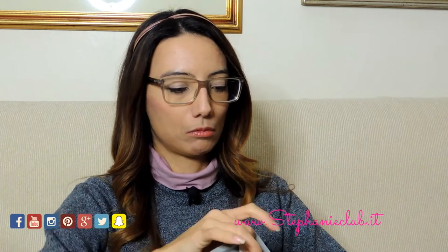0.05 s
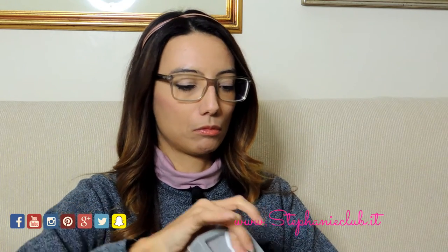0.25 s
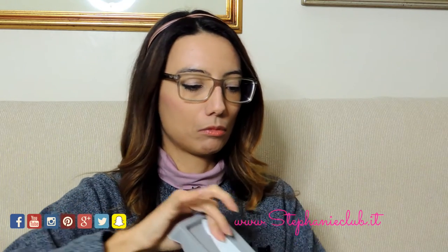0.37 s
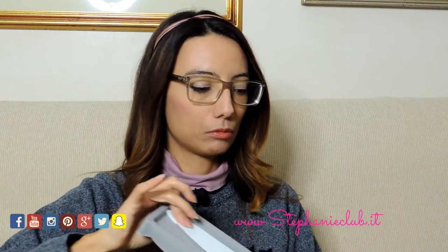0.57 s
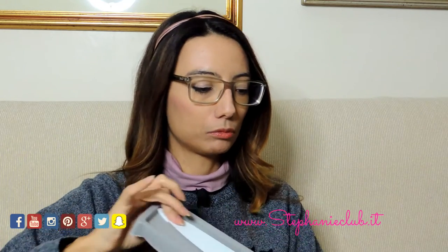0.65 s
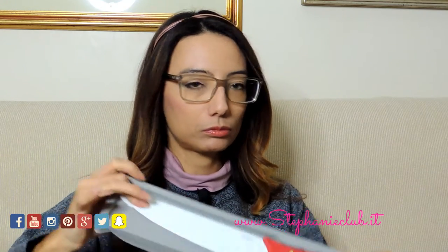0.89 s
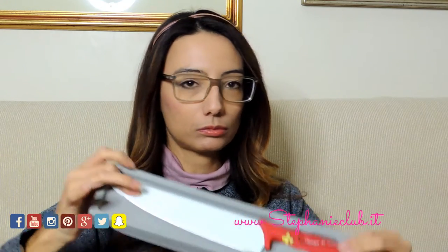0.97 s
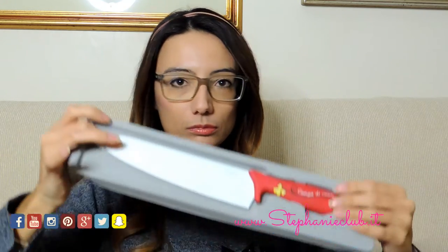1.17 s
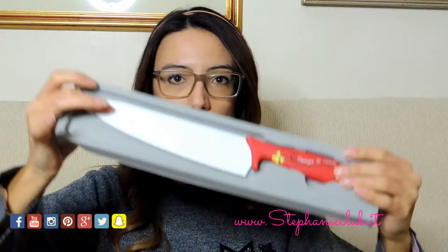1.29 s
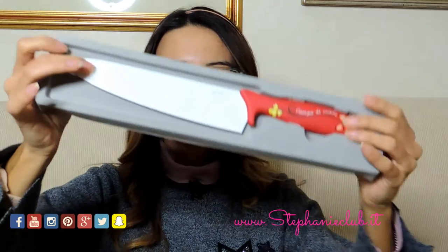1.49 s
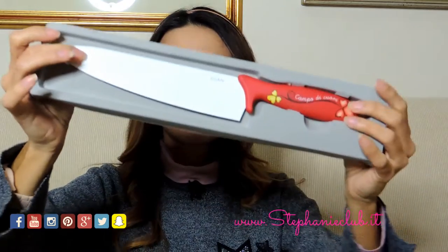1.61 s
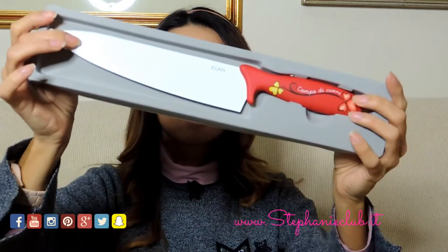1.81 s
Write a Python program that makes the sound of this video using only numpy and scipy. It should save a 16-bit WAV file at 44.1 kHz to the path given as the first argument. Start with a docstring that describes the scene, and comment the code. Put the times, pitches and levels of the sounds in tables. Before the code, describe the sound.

A moulded plastic tray snaps and knocks in the hands, then rustles softly as it is lifted

```python
"""A short fingertip stroke over a faint hiss, then snaps and knocks of a moulded plastic tray holding a knife.
Hands handle it in a living room: more strokes and a dry tick, then it is lifted with a long rustle of skin
and wool, with a second tick and soft thumps in it. Contacts ring the tray's modes, thumps ring single low
tones, strokes and rustle are made of tiny slips, and ticks are noise bursts with short resonances.
Fading noise makes the room ring on after the sounds."""
import sys
import numpy as np
from scipy import signal
from scipy.fft import rfft, irfft
from scipy.io import wavfile

SR = 44100
rng = np.random.default_rng(int(sys.argv[2]) if len(sys.argv) > 2 else 0)


def waveform_to_disk(signal):
    """Save audio, clipped to [-1, 1], as 16-bit WAV at the path in sys.argv[1]."""
    frames = np.transpose(np.atleast_2d(signal))
    scaled = np.clip(frames, -1, 1) * 32767
    samples = np.round(scaled).astype(np.int16)
    wavfile.write(sys.argv[1], SR, samples)


def convert_level_to_amplitude(level_db):
    """Map a level in decibels to its linear amplitude factor."""
    exponent = np.asarray(level_db, float) / 20
    return 10 ** exponent


N = 81585
T = np.arange(N) / SR
TILT_HZ = 1500   # a contact's tilt leaves this pitch unchanged


def rms_one(x):
    """Scale to unit rms."""
    return x / np.sqrt(np.mean(x ** 2) + 1e-20)


def at_hz(points, hz):
    """Read a table of (Hz, value) on a log-frequency axis."""
    table_hz, values = np.array(points).T
    return np.interp(np.log(hz), np.log(table_hz), values)


def drift(rate_hz):
    """Slow random wandering with spread 1: smoothed noise, made at every 40th sample."""
    pole = np.exp(-80 * np.pi * rate_hz / SR)
    noise = rng.standard_normal(N // 40 + 2002)
    slow = signal.lfilter([1], [1, -2 * pole, pole * pole], noise)[2000:]   # skip the settling
    return np.interp(np.arange(N) / 40, np.arange(len(slow)), rms_one(slow))


def ring(clicks, hz, t60):
    """A unit click starts a sine of height 1 that fades by 60 dB in t60 seconds."""
    pole, turn = convert_level_to_amplitude(-60 / (t60 * SR)), 2 * np.pi * hz / SR
    return signal.lfilter([0, np.sin(turn)], [1, -2 * pole * np.cos(turn), pole * pole], clicks + 1e-18)


def spectrum_hz():
    """The pitches of the spectrum bins, with the lowest held at 1 Hz."""
    return np.maximum(np.arange(N // 2 + 1) * SR / N, 1)


def colour(x, spectrum):
    """Shape a signal's spectrum by a table of levels, then scale it to unit rms."""
    return rms_one(irfft(rfft(x) * convert_level_to_amplitude(at_hz(spectrum, spectrum_hz())), N))


def lowpass(x, hz):
    """Gently soften everything above hz."""
    return signal.sosfilt(signal.butter(1, hz, fs=SR, output="sos"), x)


# Colour of the faint steady hiss. Each row: pitch in Hz, relative level in dB per Hz.
HISS = [(25, 4), (45, -17), (80, -19), (100, -3.5), (125, -2), (230, -4.5), (460, -7), (850, -11),
        (1530, -19.5), (2050, -20.5), (3000, -22.5), (5000, -24), (9000, -28), (15500, -33.5)]


def hiss():
    """Steady random noise, coloured and set to a low level."""
    level_db = -61.5
    return convert_level_to_amplitude(level_db) * colour(rng.standard_normal(N), HISS)


# How long the room rings. Each row: pitch in Hz, time to fade by 60 dB in seconds.
ROOM_T60 = [(150, 0.28), (400, 0.595), (1000, 0.632), (2800, 0.691), (7000, 0.476), (14000, 0.526)]


def room(x):
    """A diffuse tail: third-octave bands of noise, each dying at its own rate."""
    onset_s = 0.00924
    edges = np.minimum(22 * 2 ** np.arange(0, 10, 1 / 3), 18000)[6:]   # Hz
    white, tail = rng.standard_normal((2, N // 2)), 0
    age = np.arange(N // 2) / SR
    for k, (low, high) in enumerate(zip(edges, edges[1:])):
        bandpass = signal.butter(2, [low, high], "band", fs=SR, output="sos")
        band = signal.sosfilt(bandpass, white[k % 2])   # neighbours use different noise
        t60 = at_hz(ROOM_T60, np.sqrt(low * high))
        tail = tail + band * convert_level_to_amplitude(-60 * age / t60)
    tail = tail * np.clip(age / onset_s, 0, 1) ** 2 * 0.012
    return signal.fftconvolve(x, tail)[:N]


# What a contact sends to the walls, summed over all directions.
# Each row: pitch in Hz, relative level in dB per Hz.
RADIATED = [(80, -38), (200, -20), (450, -18), (780, -13), (930, 2.5), (1100, -6.5), (1250, -11),
            (1410, -4.5), (1620, -14), (1820, -4.5), (2050, -16), (2600, -20), (2940, -12.5), (3700, -14),
            (4800, -19), (6500, -29), (14000, -52)]


def radiated():
    """The contacts as the walls receive them: broader in pitch than at the microphone."""
    gain_db = 33.5
    hz, blows = spectrum_hz(), 0
    for s, db, tilt, _ in CONTACTS:
        delay = np.exp(-2j * np.pi * hz * s)   # places the blow at s seconds
        blows = blows + convert_level_to_amplitude(db + tilt * np.log2(hz / TILT_HZ)) * delay
    return irfft(blows * convert_level_to_amplitude(gain_db + at_hz(RADIATED, hz)), N)


def grains(spectrum):
    """Dense tiny slips of uneven size, coloured and flickering in strength."""
    per_s, spread_db, patchy_db, flicker_hz = 16000, 0.65, 1.5, 16.7
    happens = rng.random(N) < per_s / SR
    uneven = convert_level_to_amplitude(spread_db * np.minimum(rng.exponential(1, N), 4))
    slips = happens * rng.standard_normal(N) * uneven
    return rms_one(colour(slips, spectrum) * convert_level_to_amplitude(patchy_db * drift(flicker_hz)))


# The long rustle of the lift. Each row: time in seconds, level of the middle scrape in dB,
# then the level of the body and of the top, both in dB relative to the scrape.
RUSTLE = [(0.874,-83.5,-2,0.5), (0.88,-64,-11,2), (0.906,-50.5,-4,-5), (0.938,-52,1,-1.5),
          (0.965,-51.5,-2.83,-6.5), (1.028,-51.5,-6.5,4), (1.098,-51,-1,0.5), (1.125,-55,-3.5,-2),
          (1.152,-57.5,-7,1), (1.185,-54,-0.5,-3), (1.216,-49.5,-1.5,-3), (1.262,-53,0,-3),
          (1.32,-58.5,-5,-2.5), (1.356,-54,-2,0), (1.444,-56.5,-3.5,-2), (1.478,-66,-1,2), (1.54,-61,1.5,0),
          (1.68,-60,2,2), (1.83,-58,1,-0.5), (1.85,-61,-4,-1)]
# Colours of its scrape, body and top. Each row: pitch in Hz, relative level in dB per Hz.
RUSTLE_MID = [(1290, -49.5), (2200, -18.5), (2390, -3.5), (2600, -5), (3240, -1.5), (3780, -1.5),
              (4360, -0.5), (4820, -4.5), (6000, -8), (7800, -18.5), (9500, -54)]
RUSTLE_BODY = [(120, -50), (200, -20.5), (260, -13), (358, -13.5), (529, -4.5), (568, -5.5), (1470, -10),
               (2200, -11), (2860, -34.5)]
RUSTLE_TOP = [(4500, -21.5), (6000, -1), (8400, -3.5), (10500, -2.5), (13000, -6.5), (15600, -7)]


def rustle():
    """Slips heard as a scrape, through the body of the tray and as fine hiss above."""
    s, db, body_db, top_db = np.transpose(RUSTLE)

    def level(points_db):
        return convert_level_to_amplitude(np.interp(T, s, points_db, left=-120))

    scrape = level(db) * grains(RUSTLE_MID)
    body = level(db + body_db) * grains(RUSTLE_BODY)
    top = level(db + top_db) * grains(RUSTLE_TOP)
    return scrape + body + top


# Short fingertip strokes. Each row: start in seconds, time until the fall in seconds, relative level in dB,
# rise in seconds, time constant of the fall in seconds, share from 0 (dull) to 1 (bright).
STROKES = [(0.013, 0.0159, -49, 0.00334, 0.01097, 0.35), (0.075, 0.0386, -60.5, 0.01, 0.004, 0.11),
           (0.44, 0.0713, -58, 0.052, 0.0045, 0.6), (0.631, 0.0675, -49, 0.0165, 0.00177, 0.66),
           (0.721, 0.0477, -69.5, 0.006, 0.0078, 0)]
# Colour of the strokes. Each row: pitch in Hz, relative level in dB per Hz.
STROKE = [(710, -54.5), (1200, -2.5), (1520, -9), (1650, -4), (2070, -12.5), (2260, -7.5), (3500, 2),
          (7330, -2.5), (8790, -2.5), (15500, -9)]


def strokes():
    """Tiny slips, mixed from dull and bright parts, under an envelope of rise, hold and fall."""
    split_hz, out = 3360, 0
    slips = grains(STROKE)
    dull = lowpass(slips, split_hz)
    for s, length, db, rise, fall, bright in STROKES:
        envelope = np.clip((T - s) / rise, 0, 1) * np.exp(-np.maximum(T - s - length, 0) / fall)
        mix = 2 * ((1 - bright) * dull + bright * (slips - dull))
        out = out + convert_level_to_amplitude(db) * envelope * mix
    return out


# Soft thumps of the held tray. Each row: start in seconds, level in dB before the soft onset and fading,
# pitch in Hz, time to fade by 60 dB in seconds.
THUMPS = [(.1488, -38, 327, 0.0298), (.152, -50.5, 164.7, 0.072), (0.2188, -26.5, 160.1, 0.0454),
          (0.9239, -34.5, 288.6, 0.0377), (.9468, -32, 355, 0.0327), (.966, -30.5, 303, 0.0096),
          (1.269, -40.5, 609.5, 0.03), (1.2745, -37.5, 677, 0.0264), (1.385, -49.5, 516, 0.052),
          (1.6125, -28.5, 279.1, 0.0306)]


def thumps():
    """A soft push rings one low mode for a few cycles."""
    out = np.zeros(N)
    for s, db, hz, t60 in THUMPS:
        age = np.maximum(T - s, 0)
        soft_onset = 1 - np.exp(-age * hz * 2.59)
        out -= convert_level_to_amplitude(db - 60 * age / t60) * np.sin(2 * np.pi * hz * age) * soft_onset
    return out


# Dry bright ticks. Each row: start in seconds, relative level in dB, upper resonance in Hz,
# lower resonance in Hz, level of the lower one in dB relative to the upper.
TICKS = [(.5566, -31.5, 4585, 1235, -4), (0.9422, -32, 4990, 1822, 3.5)]


def ticks():
    """A fast-dying burst of noise and a click, with the burst heard directly and both through three resonances."""
    rise_s, t60_s, ring_cycles = 0.0005486, 0.01153, 16.9
    air_db, air_hz, click_db, low_cut_hz = -1.5, 8740, 2.5, 288
    pair_ratio, pair_db = 1.157, -4   # a neighbour of the upper resonance
    out, noise = 0, rng.standard_normal(N)
    air = signal.butter(1, [900, air_hz], "band", fs=SR, output="sos")
    for s, db, high_hz, low_hz, low_db in TICKS:
        fade = convert_level_to_amplitude(db - 60 * np.maximum(T - s, 0) / t60_s)
        burst = np.clip((T - s) / rise_s, 0, 1) * fade * noise
        click = np.arange(N) == int((s + rise_s) * SR)
        drive = 0.1645 * burst + 0.24 * convert_level_to_amplitude(db + click_db) * click
        out = out + convert_level_to_amplitude(air_db) * signal.sosfilt(air, burst)
        for hz, gain_db in ((high_hz, 0), (high_hz * pair_ratio, pair_db), (low_hz, low_db)):
            out = out + convert_level_to_amplitude(gain_db) * np.sqrt(hz / high_hz) * ring(drive, hz, ring_cycles / hz)
    return signal.sosfilt(signal.butter(2, low_cut_hz, "high", fs=SR, output="sos"), out)


# Hard contacts on the tray. Each row: time in seconds, relative level in dB,
# tilt in dB per octave about TILT_HZ, pitch in Hz near which the grip mutes the modes.
CONTACTS = [(0.1488, -30.5, 0.5, 880), (0.1512, -39, 8.5, 6930), (0.2146, -29, -2, 2750),
            (0.2185, -14.5, -3, 2200), (.2203, -24.5, 6, 6800), (0.2222, -25.5, 5.5, 2750),
            (0.2349, -29, -2, 2750)]
# The tray's own ringing modes. Each row: pitch in Hz, relative level in dB, time to fade by 60 dB in seconds.
TRAY = [(463, -13.5, 0.0284), (686, -4.5, 0.016), (879, -0.5, 0.0236), (1097, -3, 0.027),
        (1371, -10, 0.0327), (1764, -9, 0.024), (2149, -14.5, 0.022), (2793.4, -4.5, 0.0194),
        (3423, -6.5, 0.00815), (3701, -4, 0.0092), (4052, -8.5, 0.0119), (4647, -11, 0.0099),
        (5600, -8.5, 0.003), (7153, -14, 0.0062), (8900, -22.5, 0.0043)]


def contacts():
    """Each contact strikes all modes of the tray and adds a short crack of noise."""
    mute_depth_db, mute_octaves, scatter_db = -6, 0.085, 4
    crack_db, crack_t60_s, crack_cut_hz = -10.5, 0.01386, 7760
    s, db, tilt, muted_hz = np.transpose(CONTACTS)
    at = (s * SR).astype(int)
    scatter = scatter_db * rng.standard_normal((len(s), len(TRAY)))
    modes = 0
    for k, (hz, level_db, t60) in enumerate(TRAY):
        mute_db = mute_depth_db * np.exp(-(np.log2(hz / muted_hz) / mute_octaves) ** 2)
        strike_db = db + level_db + mute_db + tilt * np.log2(hz / TILT_HZ) + scatter[:, k]
        clicks = np.zeros(N)
        clicks[at] = convert_level_to_amplitude(strike_db) * (-1) ** k   # neighbouring modes start in opposite directions
        modes = modes + ring(clicks, hz, t60)
    clicks = np.zeros(N)
    clicks[at] = convert_level_to_amplitude(db + crack_db + tilt)
    envelope = signal.lfilter([1], [1, -convert_level_to_amplitude(-60 / (crack_t60_s * SR))], clicks)
    return modes + envelope * lowpass(rng.standard_normal(N), crack_cut_hz)


def scene():
    """Tray and hands, their room tail and the hiss."""
    taps_to_room_db, rubs_to_room_db = -8, -7
    taps = ticks() + thumps()
    rubs = strokes() + rustle()
    wet = room(radiated() + convert_level_to_amplitude(taps_to_room_db) * taps + convert_level_to_amplitude(rubs_to_room_db) * rubs)
    return (contacts() + taps + rubs + wet + hiss())[None]


def roll_off(x):
    """The treble ends steeply here."""
    return signal.sosfilt(signal.butter(12, 16360, fs=SR, output="sos"), x)


def record(dry):
    """The microphone loses the deep bass, then a steep filter cuts the top."""
    bass_cut_hz, top_cut_hz = 75.8, 15850
    mix = signal.sosfilt(signal.butter(2, bass_cut_hz, "high", fs=SR, output="sos"), dry)
    mix = signal.sosfilt(signal.cheby2(20, 60, top_cut_hz, fs=SR, output="sos"), mix)
    return roll_off(mix)


dry = scene()
out = record(dry)
waveform_to_disk(out)
```